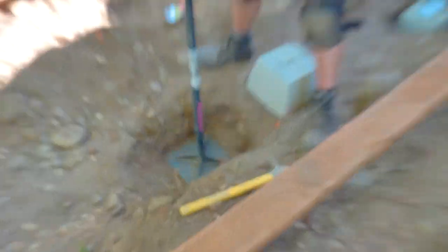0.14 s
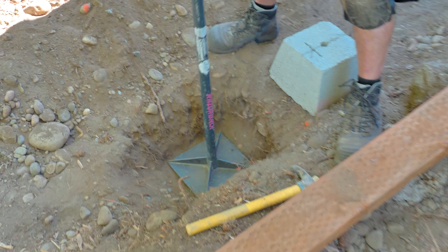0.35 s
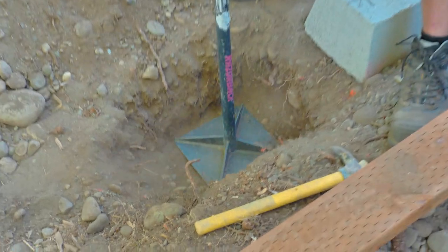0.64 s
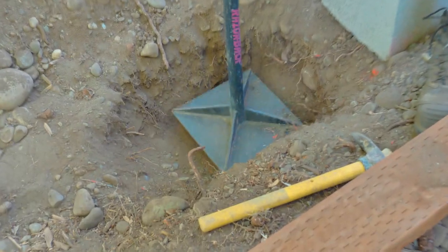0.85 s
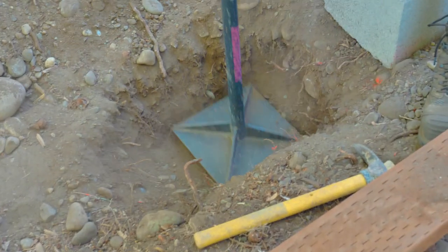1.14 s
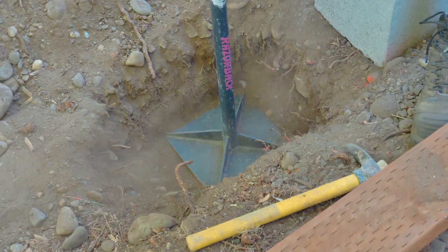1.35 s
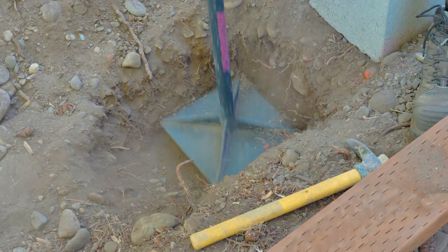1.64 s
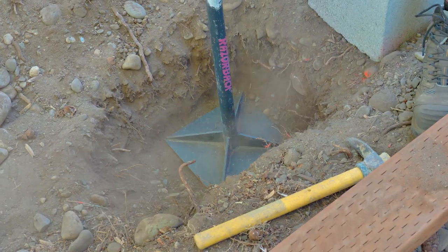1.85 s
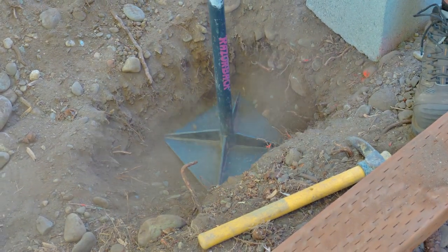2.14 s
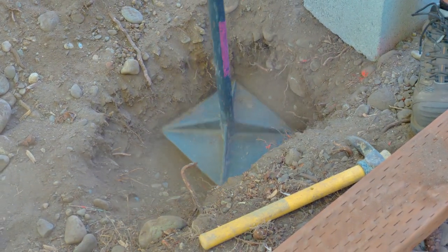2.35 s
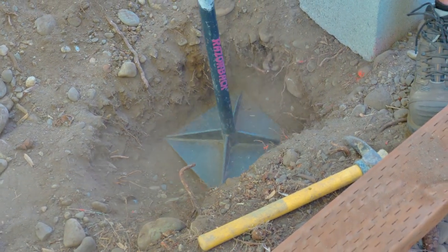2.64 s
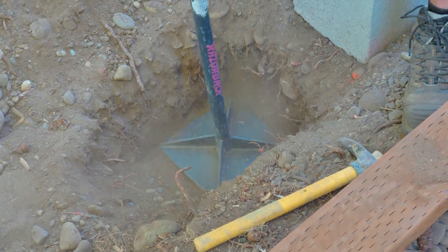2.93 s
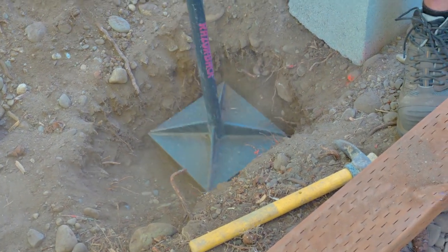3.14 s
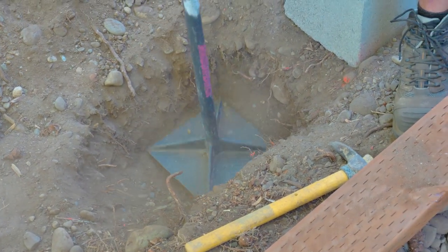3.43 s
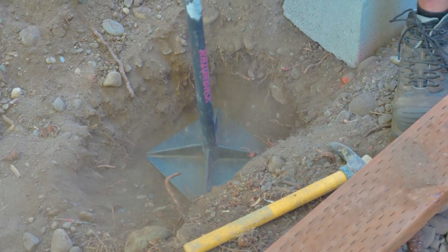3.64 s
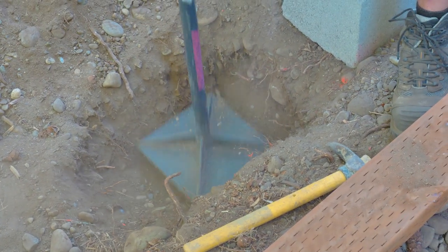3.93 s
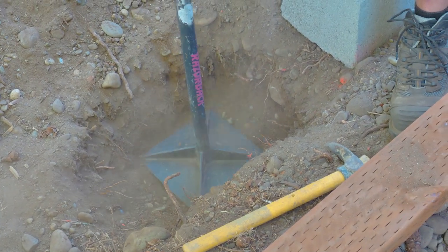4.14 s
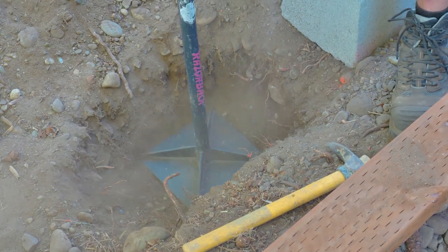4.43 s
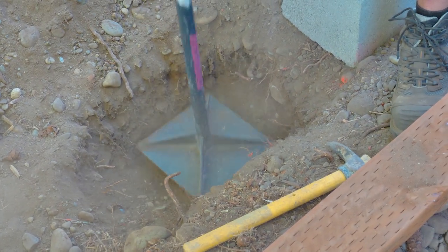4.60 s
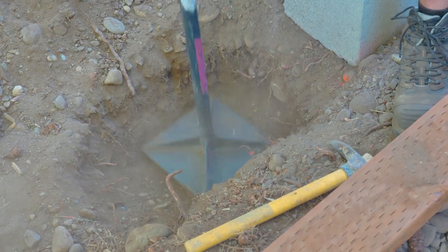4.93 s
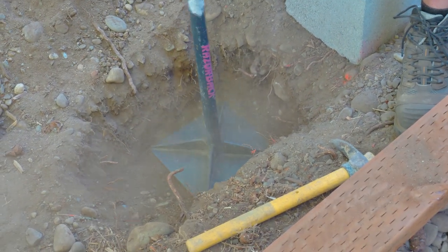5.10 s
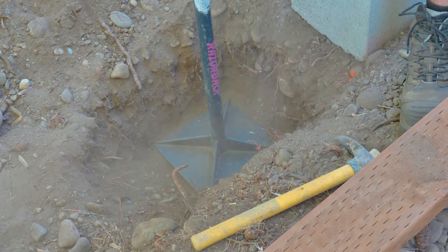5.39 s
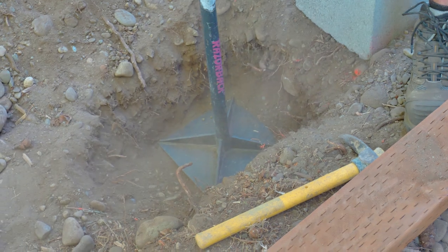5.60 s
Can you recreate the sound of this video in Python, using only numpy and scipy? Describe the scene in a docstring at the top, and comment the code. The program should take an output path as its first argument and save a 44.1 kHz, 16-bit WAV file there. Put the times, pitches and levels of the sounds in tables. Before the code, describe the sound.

A hand tamper with a steel plate pounds stony soil in a hole outdoors, heard close through a small, bass-light microphone. At about 0.2 s comes a weak, scrapy landing with a cluster of pebble ticks and dull stone knocks. A full blow follows at 0.63 s, then strikes at 1.0, 1.4, 1.8, 2.2 and 2.6 s, continuing about every 0.38 s to a last one at 5.2 s. Each is a millisecond-short gritty crunch, airy slap and tight hollow thud, then crumbling soil. Blows around 1.8 to 2.6 s are duller on top; the one at 2.6 s has little thump but more plate ring. A brighter pebble clink rings at 1.27 s. Small ticks and falling grains fill the gaps as faint steel tones fade. Sand runs briefly, swelling from 5.45 to 5.67 s and stopping abruptly. Faint rumble, soft hiss and a dull, short yard echo remain underneath.

```python
"""Pounding soil with a hand tamper

A steel-plate tamper pounds stony soil at the bottom of a hole outdoors, near a small microphone.
Each blow crunches (random cracking grains), slaps (short noise bursts) and thuds (pushes that ring the hole).
Plate and shaft ring on as fading sines; pebbles tick against the steel and soil crumbles (shaped noise).
The yard answers dully with fading noise, over a faint outdoor floor, a run of sand and microphone hiss."""
import sys
import numpy as np
from scipy import signal
from scipy.io import wavfile

SR = 44100
rng = np.random.default_rng(int(sys.argv[2]) if len(sys.argv) > 2 else 0)


def inscribe(sig):
    """Save sig as 16-bit PCM at rate SR to the path in sys.argv[1].

    A 1-D sig is mono; a 2-D sig holds one channel per row.
    Samples are clipped to [-1, 1] before scaling.
    """
    pcm = np.round(np.clip(np.atleast_2d(sig).T, -1, 1) * 32767)
    wavfile.write(sys.argv[1], SR, pcm.astype(np.int16))


N = 254016

# In all tables and settings, t60 is the time in seconds to fade by 60 dB.

# The blows. Each row: first touch in seconds, crunch length in seconds, crunch in dB, crunch treble in dB,
# slap in dB, thud in dB, plate in dB, shaft in dB, crumbling soil in dB, timber in dB.
BLOWS = [(0.1829, 0.0043, -12, -7, -11, -27.5, -50, -56, -17, -63),
         (0.6314, 0.007, -14.5, 1, 2, -5.5, -32.5, -51.5, -26.5, -67.5),
         (1.0002, 0.0057, -11, 3, 3, -6.5, -29.5, -78, -28.5, -77),
         (1.377, 0.0085, -15.5, 0.5, 1.5, -5, -32, -43.5, -27.5, -62),
         (1.7778, 0.0052, -9, -22.5, -2, -6, -24, -58, -26, -31.5),
         (2.17, 0.01, -9, -41, -3, -8, -32.5, -49.5, -30.5, -31),
         (2.5578, 0.0069, -8.5, -42, -8, -29, -22.5, -42, -19, -69),
         (2.934, 0.0059, -17, -6, 3.5, -5, -43.5, -74, -23.5, -50.5),
         (3.3068, 0.0062, -16, 4.5, -16.5, -3.5, -33.5, -64, -20.5, -34.5),
         (3.6906, 0.0018, -8, 1, -5.5, -4.5, -37.5, -71.5, -24, -63),
         (4.0676, 0.0063, -17, 2, 0, -3.5, -38, -75, -31, -37),
         (4.4356, 0.005, -15, 5, -5.5, -5, -31.5, -41, -27.5, -43),
         (4.807, 0.0055, -17, -0.5, -4, -4, -30.5, -52, -22.5, -39.5),
         (5.1798, 0.0054, -12.5, -2.5, 1, -6.5, -34, -44.5, -22, -23.5)]
# The plate lands a second time. Each row: start of the push in seconds, thud in dB.
REBOUNDS = [(0.212, -27.5), (0.238, -37.5), (2.594, -44), (2.978, -18)]
# Pebbles against the steel. Each row: time in seconds, tick in dB, plate ring in dB,
# brightness of the ring in dB per octave, shaft ring in dB.
PEBBLE_TICKS = [(0.081, -48, -79, 2, -90), (.168, -30.5, -39, -10, -55), (0.207, -31, -40.5, 9, -55),
                (.22, -30, -28, -5, -53), (0.248, -21, -58, 20, -40), (.335, -45.5, -73, -12, -81),
                (0.699, -46, -70, 0, -65), (.81, -43, -58.5, 8, -58), (.953, -54, -58, 4, -93.5),
                (1.06, -49, -54, 2, -75), (1.176, -42, -52, -5, -78), (1.215, -54, -60.5, 9.5, -64),
                (1.268, -21.5, -19, 1, -34), (1.34, -39, -37.5, -12.5, -59), (1.405, -40.5, -57, 12, -70),
                (1.455, -45, -65, 5, -80), (1.508, -43, -73, 5, -87), (1.525, -24.5, -34, -5.5, -44.5),
                (1.585, -45, -42.5, -1.5, -71), (1.862, -24.5, -44, -2.5, -45),
                (2.199, -47, -33.5, -3.5, -77), (2.237, -30.5, -61, 12, -65), (2.253, -35.5, -68, 3, -73),
                (2.338, -46.5, -53, -2, -70), (2.374, -55, -60, 6.5, -66), (2.47, -65, -61, 3, -83),
                (2.54, -39, -40.5, -7, -74), (2.595, -29.5, -30.5, -1.5, -66),
                (2.638, -33.5, -59.5, 12, -70), (2.706, -39.5, -55, 4, -63.5),
                (2.874, -44.5, -53.5, 5.5, -80), (2.974, -27, -35, -3.5, -64.5),
                (3.012, -34.5, -53, -4.5, -66), (3.212, -57, -51.5, -3.5, -79),
                (3.384, -46.5, -69, -5.5, -89.5), (3.518, -47, -54, 7, -75), (3.593, -54, -53.5, 5, -72.5),
                (3.664, -57, -60, 5.5, -63), (3.77, -39.5, -52.5, -4.5, -89.5),
                (3.845, -46, -51.5, 1, -67.5), (4.148, -37, -55, -0.5, -66), (4.094, -49, -61.5, -5, -69.5),
                (4.174, -48, -58.5, 7.5, -76), (4.189, -32.5, -41.5, -0.5, -54),
                (4.275, -39.5, -51.5, 5.5, -71), (4.475, -35, -59, 2, -82), (4.524, -34, -47.5, 5, -61),
                (4.586, -47.5, -54.5, -2.5, -82), (4.715, -51, -54.5, 4.5, -90.5),
                (4.784, -52.5, -80.5, -2.5, -90.5), (4.843, -39, -58.5, 9.5, -67),
                (4.898, -34.5, -53, -5, -67), (5.022, -44, -51, 6, -78.5), (5.227, -55, -44, -9, -74),
                (5.278, -38.5, -60, -12, -50.5), (5.37, -42.5, -56, -3, -75), (5.413, -49, -70, 1, -71),
                (5.555, -50, -58, -6, -78), (5.613, -44, -52, -5.5, -80), (5.699, -48, -59.5, -2, -79)]
# Dull knocks of stone on stone. Each row: time in seconds, level in dB.
STONE_KNOCKS = [(.127, -42.5), (.168, -38), (0.207, -23.5), (1.343, -36), (1.353, -27.5), (1.527, -42),
                (1.56, -48), (2.494, -54.5), (2.541, -40), (2.598, -30.5), (2.978, -39), (4.19, -51),
                (4.475, -40), (5.281, -49), (5.37, -54)]

# Ringing tones of the steel plate. Each row: pitch in Hz, level in dB, t60 in seconds.
PLATE_MODES = [(802, -30, 1.5), (1141, -16, .15), (1550, -22, .3), (1723, -20, .3), (2110, -20, .18),
               (2345, -14, .45), (2880, -17, .35), (3214, -2, .22), (3250, -3, .1), (3278, -4, .27),
               (3320, -8, .2), (4037, -14, .5), (4085, -12, .5), (4258, -17, .12), (4662, -11, .4),
               (4808, -11, .4), (5518, -9, .14), (5960, -6, .28), (6772, -12, .12), (6912, -17, .25),
               (7187, -8, .11), (7671, -16, .13), (8490, -11, .13), (8705, -13, .17), (9155, -19, .14),
               (9415, -13, .075), (10120, -21, .065), (11180, -24, .11)]
# Ringing tones of the shaft. Each row: pitch in Hz, level in dB, t60 in seconds.
SHAFT_MODES = [(6655, 0, .36), (13500, -8, .1)]
# Soil and air of the hole. Each row: pitch in Hz, level in dB, t60 in seconds.
HOLE_MODES = [(118.1, -4.5, 0.064), (223.3, 14.5, 0.021), (281, 18, 0.0061)]
# A beam at the rim that hums along. One row: pitch in Hz, t60 in seconds.
TIMBER_MODE = (525, .2)

# Tone colour of the crunch. Each row: frequency in Hz, relative level in dB per Hz.
CRUNCH_COLOUR = [(600, -15), (1000, -1.5), (2200, 1.5), (4000, 2.5), (6000, -3), (8500, 2.5), (11000, -4),
                 (15000, -19)]
# Tone colour of the crumbling soil. Each row: frequency in Hz, relative level in dB per Hz.
SETTLING_COLOUR = [(400, 9), (1000, 11.5), (2500, -4), (4000, -0.5), (7000, -18.5), (11000, -17.5),
                   (15000, -20.5)]
# Tone colour of ticks and dropping grains. Each row: frequency in Hz, relative level in dB per Hz.
TICK_COLOUR = [(600, -19), (2000, -5.5), (4000, 3.5), (8000, 6.5), (11000, -3), (15000, -3)]
# Tone colour of the outdoor rumble. Each row: frequency in Hz, relative level in dB per Hz.
FLOOR_COLOUR = [(60, 2), (110, 9.5), (220, 7), (400, -2), (900, 0), (1500, -5), (2500, -10), (3600, -4.5),
                (5500, -20.5), (9000, -22)]
# Loudness of the outdoor rumble over time. Each row: time in seconds, level in dB.
FLOOR_LEVEL = [(0.0, -56), (0.22, -50), (1.0, -53.5), (1.84, -49.5), (2.0, -55.5), (4.09, -60.5),
               (5.76, -57.5)]
# Echoes of the yard. Each row: frequency in Hz, relative level in dB per Hz, t60 in seconds.
YARD_ECHO = [(70, -15.5, 0.35), (132, -6, 0.84), (223, 0.5, 0.3), (330, 0.5, 0.58), (474, -3.5, 0.21),
             (1460, 10.5, 0.067), (5070, -57.5, 0.05), (14000, -37, .1)]

# An edge touches first, and the crackle fades once the plate is flat.
LEAD_S, LEAD_DB, AFTER_S = .002, -14, .001
COARSE_GRIT_HZ, TREBLE_HZ = 3000, 7950   # coarse grit lies below the first; each blow sets its level above the second
FINE_SHARE = 0.43   # fine grit weakens after this share of the crunch
PUSH_S, SLAP_HZ = 0.005, 1190
BLOW_RING_DB_PER_OCTAVE = -2.5   # high plate tones start weaker after a blow
# Soil damps the plate while it lies flat, the hands always.
PRESSED_S, PRESSED_T60_S, HAND_T60_S = .07, .3, 2.5
TICK_RISE_S = .0012
TICK_T60_S, TICK_LINGERS = .025, 0.4   # t60 of a -45 dB tick; growth of log t60 per 20 dB, so louder ones draw out
CHATTER_DB, CHATTER_T60_S = -24, 0.017   # the grit of a tick rings briefly in the plate
SOIL_T60_S = 0.11
# Loose sand runs down the wall.
SAND_S, SAND_START_S, SAND_PEAK_S, SAND_DB = 5.43, .04, 5.674, -46   # start, fade-in, peak, level at the peak
SAND_RISE_DB_PER_S, SAND_STOP_DB_PER_S = 65, 600
MIC_HISS_DB = -64.5   # before its band filter
MIC_LOW_HZ, CUTOFF_HZ = 94, 16600


def from_db(db):
    """Turn a level in dB into a gain."""
    return 10 ** (np.asarray(db) / 20)


def rms_one(x):
    """Scale a signal to rms 1."""
    return x / np.sqrt(np.mean(x ** 2) + 1e-20)


def at_hz(points, hz, column=1):
    """Read a table column at a frequency, along a logarithmic axis."""
    points = np.array(points)
    return np.interp(np.log(hz), np.log(points[:, 0]), points[:, column])


def in_time(rows):
    """Draw a curve through (seconds, value) rows, one value per sample."""
    return np.interp(np.arange(N) / SR, *np.transpose(rows))


def band_pass(x, low, high, order):
    """Keep what lies between two frequencies in Hz."""
    return signal.sosfilt(signal.butter(order, [low, high], "band", fs=SR, output="sos"), x)


def one_sided(x, hz, kind):
    """Keep what lies below ("low") or above ("high") a frequency."""
    return signal.sosfilt(signal.butter(2, hz, kind, fs=SR, output="sos"), x)


def ring(drive, hz, t60):
    """A resonator: a unit click sets a sine ringing from about height 1."""
    r = from_db(-60 / (t60 * SR))
    w = 2 * np.pi * hz / SR
    return signal.lfilter([0, np.sin(w)], [1, -2 * r * np.cos(w), r * r], drive + 1e-18)


def bands(x):
    """Split into half-octave bands with their centres; two signals take turns from band to band."""
    x = np.atleast_2d(x)
    edges = 50 * 2 ** np.arange(0, 8.6, .5)
    for k, (low, high) in enumerate(zip(edges, edges[1:])):
        sign = (-1) ** k   # lets neighbouring bands add where they overlap
        yield np.sqrt(low * high), sign * band_pass(x[k % len(x)], low, high, order=2)


def coloured(x, spectrum):
    """Weight each band by a tone colour, keeping the power of white input."""
    impulse = np.eye(1, 4096)[0]
    response = sum(from_db(at_hz(spectrum, hz)) * band for hz, band in bands(impulse))
    shaped = sum(from_db(at_hz(spectrum, hz)) * band for hz, band in bands(x))
    return shaped / np.sqrt(np.sum(response ** 2))


def grit(per_s, spread_db):
    """Grains crack at random with very uneven sizes, over a little hiss; rms 1."""
    sizes = from_db(spread_db * np.minimum(rng.exponential(1, N), 4)) * rng.choice([-1, 1], N)
    cracks = rms_one(sizes * (rng.random(N) < per_s / SR))
    return rms_one(cracks + 0.22 * rng.standard_normal(N))


def clicks(times, db):
    """Place one click at each time."""
    out = np.zeros(N)
    np.add.at(out, np.round(np.asarray(times) * SR).astype(int), from_db(db))
    return out


def dying(times, db, t60):
    """A loudness curve that jumps at each time and dies away."""
    return signal.lfilter([1], [1, -from_db(-60 / (t60 * SR))], clicks(times, db) + 1e-18)


def crunch():
    """Grit breaks under the descending plate: fine grains crack first, coarse ones swell until it lies flat."""
    t = np.arange(N) / SR
    fine, coarse, treble_db = np.zeros(N), np.zeros(N), np.zeros(N)
    for s, length, db, bright_db, *_ in BLOWS:
        progress = (t - s) / length   # 0 at first touch, 1 when flat
        early = from_db(LEAD_DB) * np.clip(1 + (t - s) / LEAD_S, 0, 1)
        after = np.exp(-np.maximum(t - s - length, 0) / AFTER_S)
        fine_main = after * np.where(progress < FINE_SHARE, 1, 0.4)
        coarse_main = after * (0.092 + 0.85 * np.minimum(progress, 1))
        fine += from_db(db) * np.where(progress < 0, early, fine_main)
        coarse += from_db(db) * np.where(progress < 0, 0.3 * early, coarse_main)
        treble_db[t > s - .05] = bright_db
    grains = grit(10000, spread_db=4.5)
    low = one_sided(coarse * grains, COARSE_GRIT_HZ, "low")
    high = one_sided(fine * grains, COARSE_GRIT_HZ, "high")
    full = coloured(low - high, CRUNCH_COLOUR)
    dull = one_sided(full, TREBLE_HZ, "low")
    return dull + from_db(treble_db) * (full - dull)


def slap_and_thud():
    """Air bursts out from under the plate; the soil takes the push and the hole booms, while a beam hums."""
    s, length, _, _, slap_db, thud_db, *_, timber_db = np.transpose(BLOWS)
    flat = s + length
    bursts = dying(flat - .003, slap_db, 0.0094) * rng.standard_normal(N)
    crack = 0.23 * ring(bursts, SLAP_HZ, 0.0026)
    hollow_body = 0.016 * ring(bursts, SLAP_HZ / 2, 0.007)
    push = np.gradient(np.hanning(int(PUSH_S * SR)))   # sound follows the change of the force
    starts = clicks(flat - .0034, thud_db) + clicks(*np.transpose(REBOUNDS))
    pushes = np.convolve(starts, push / np.abs(push).sum())[:N]
    boom = -sum((-1) ** k * from_db(db) * ring(pushes, hz, t60) for k, (hz, db, t60) in enumerate(HOLE_MODES))
    return crack + hollow_body + boom + ring(clicks(flat, timber_db), *TIMBER_MODE)


def steel():
    """Each contact adds energy to every mode, by a share of its own; landing on the soil stills what rang before."""
    s, length, *_, plate_db, shaft_db, _, _ = np.transpose(BLOWS)
    landings = s + length
    t = np.arange(N) / SR
    blows = np.c_[landings, plate_db, np.full(len(s), BLOW_RING_DB_PER_OCTAVE), shaft_db]
    pebble_hits = np.delete(PEBBLE_TICKS, 1, axis=1)   # all columns but the tick level
    hit_s, plate_db, slope_db, shaft_db = np.r_[blows, pebble_hits].T
    modes = PLATE_MODES + SHAFT_MODES
    chance_db = rng.normal(0, 3.5, (len(hit_s), len(modes)))
    pressed = sum((t > s) & (t < s + PRESSED_S) for s in landings)
    raining = dying(landings, np.full(len(s), -53.), 0.44)   # sand keeps falling on the lifted plate
    out = np.zeros(N)
    cuts = np.round(np.r_[0, landings - .001, N / SR] * SR).astype(int)
    for k, (hz, db, t60) in enumerate(modes):
        on_plate = k < len(PLATE_MODES)
        struck_db = plate_db + slope_db * np.log2(hz / 3300) if on_plate else shaft_db
        grains = from_db(db) * raining * rng.standard_normal(N) * (rng.random(N) < 60 / SR)
        energy = grains ** 2 + clicks(hit_s, 2 * (struck_db + db + chance_db[:, k]))   # doubled dB: energy
        damping = 1 / t60 + 1 / HAND_T60_S + on_plate * pressed / PRESSED_T60_S
        loss = 2 * np.log(1000) / SR * damping   # energy loss per sample
        for a, b in zip(cuts, cuts[1:]):
            lost = np.exp(np.cumsum(loss[a:b]))
            height = np.sqrt(np.cumsum(energy[a:b] * lost) / lost)
            out[a:b] += height * np.sin(2 * np.pi * (hz * t[a:b] + rng.random()))
    return out


def pebbles():
    """Stone meets steel in a gritty tick, drawn out when it is strong, and now and then stone knocks dully."""
    t = np.arange(N) / SR
    shape = np.zeros(N)
    for s, tick_db, *_ in PEBBLE_TICKS:
        near = slice(round(s * SR), round(s * SR) + SR // 4)
        t60 = TICK_T60_S * np.exp(TICK_LINGERS * (tick_db + 45) / 20)
        rise = 1 - np.exp(-np.abs(t[near] - s) / TICK_RISE_S)
        shape[near] += from_db(tick_db - 60 * (t[near] - s) / t60) * rise
    knock_noise = dying(*np.transpose(STONE_KNOCKS), 0.0084) * rng.standard_normal(N)
    knock = 0.91 * ring(knock_noise, 1000, 0.0047)
    grains = shape * grit(8000, spread_db=4.0)
    chatter = sum(from_db(CHATTER_DB + db) * ring(grains, hz, CHATTER_T60_S) for hz, db, _ in PLATE_MODES)
    return coloured(grains, TICK_COLOUR) + chatter + knock


def settling():
    """Soil crumbles for a moment after the plate has landed; single grains keep dropping for longer."""
    s, length, *_, soil_db, _ = np.transpose(BLOWS)
    landings = s + length
    crumble = dying(landings, soil_db, SOIL_T60_S)
    sizes = rng.exponential(1, N) * (rng.random(N) < 70 / SR)
    drops = sizes * dying(landings, np.full(len(s), -50.), 0.21)
    # each drop is a noise burst with a t60 of 4 ms
    drops = signal.lfilter([1], [1, -from_db(-60 / (0.004 * SR))], drops) * rng.standard_normal(N)
    return coloured(crumble * grit(2500, spread_db=4.0), SETTLING_COLOUR) + coloured(drops, TICK_COLOUR)


def yard(x):
    """Walls and timber scatter the sound back: noise that dies band by band."""
    t = np.arange(SR) / SR
    tail = np.zeros(SR)
    for hz, band in bands(rng.standard_normal((2, SR))):
        tail += band * from_db(at_hz(YARD_ECHO, hz) - 60 * t / at_hz(YARD_ECHO, hz, column=2))
    onset = np.clip((t - .012) / 0.0011, 0, 1)   # echoes begin after 12 ms
    return signal.fftconvolve(x, tail * onset)[:N]


def background():
    """Distant rumble, a run of loose sand and steady microphone hiss, each made of filtered noise."""
    floor = from_db(in_time(FLOOR_LEVEL)) * coloured(rng.standard_normal((2, N)), FLOOR_COLOUR)
    t = np.arange(N) / SR
    below_peak_db = np.maximum(SAND_RISE_DB_PER_S * (SAND_PEAK_S - t), SAND_STOP_DB_PER_S * (t - SAND_PEAK_S))
    sand_gain = np.clip((t - SAND_S) / SAND_START_S, 0, 1) * from_db(SAND_DB - below_peak_db)
    sand = band_pass(grit(15000, spread_db=2.0), 2500, 14000, order=1)
    hiss = band_pass(rng.standard_normal(N), 3000, 12000, order=1)
    return floor + sand_gain * sand + from_db(MIC_HISS_DB) * hiss


def scene():
    """All sources add up at one microphone."""
    tamper = crunch() + slap_and_thud() + steel() + pebbles() + settling()
    return (tamper + from_db(-50) * yard(tamper) + background())[None]


def record(dry):
    """The small microphone drops the deep bass, peaks are rounded, the top is cut."""
    thin = signal.sosfilt(signal.butter(6, MIC_LOW_HZ, "high", fs=SR, output="sos"), dry)
    rounded = 1.15 * np.tanh(thin / 1.15)
    return signal.sosfilt(signal.cheby2(12, 60, CUTOFF_HZ, fs=SR, output="sos"), rounded)


dry = scene()
out = record(dry)
inscribe(out)
```